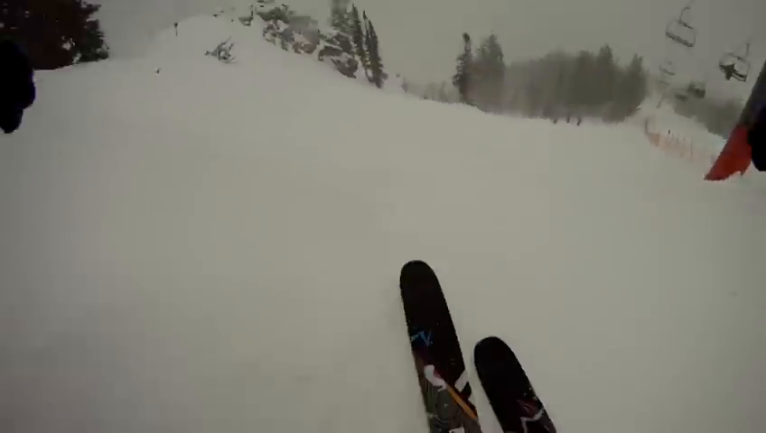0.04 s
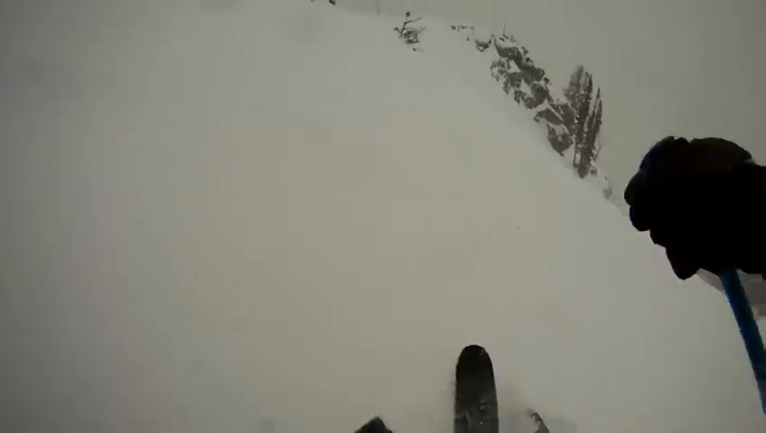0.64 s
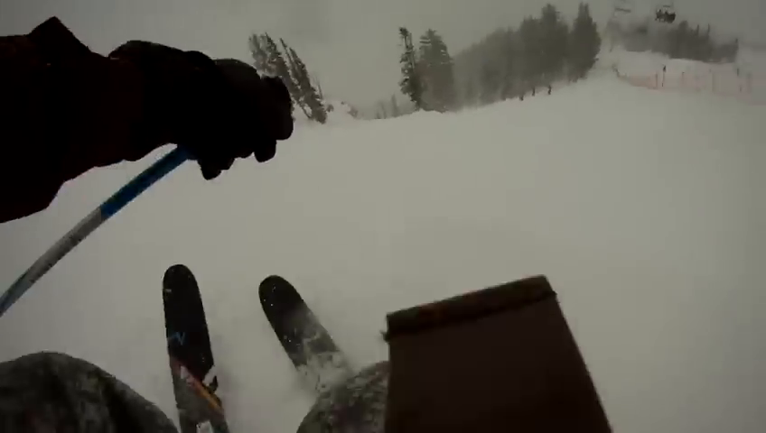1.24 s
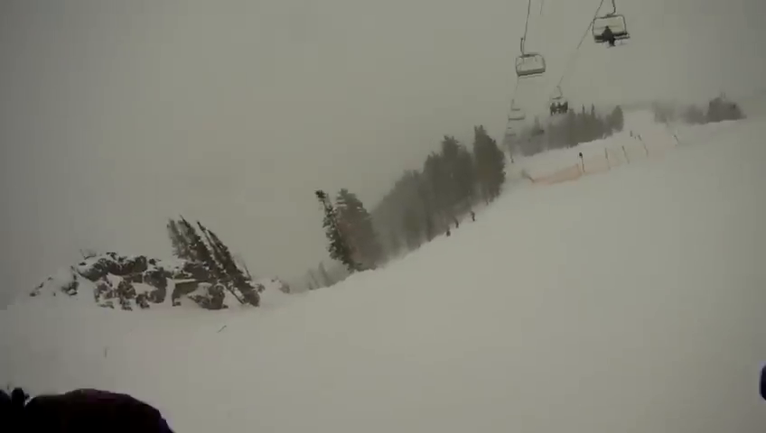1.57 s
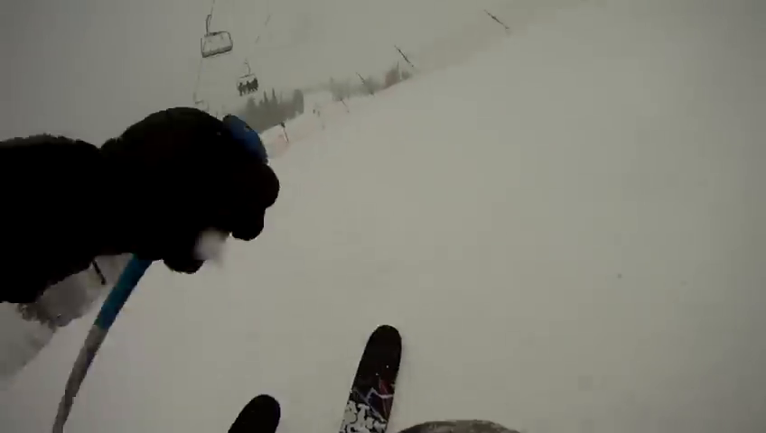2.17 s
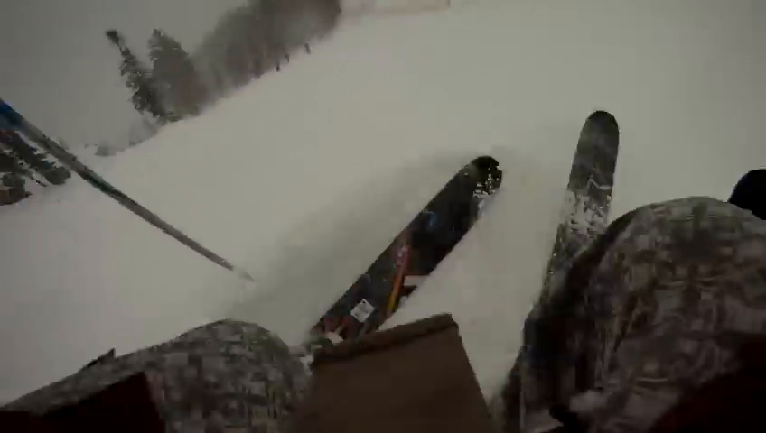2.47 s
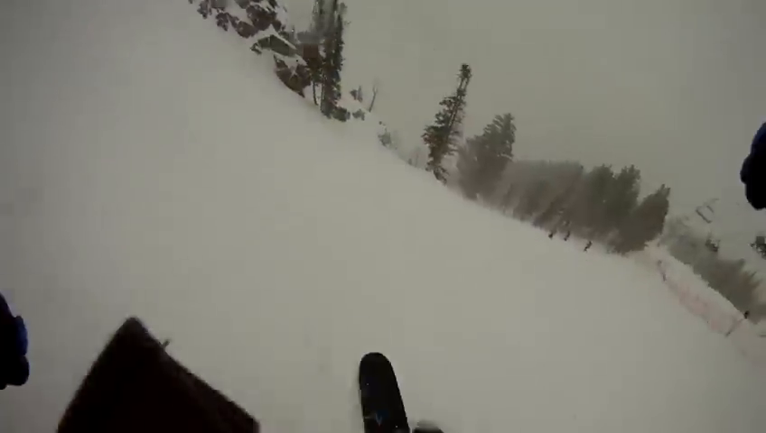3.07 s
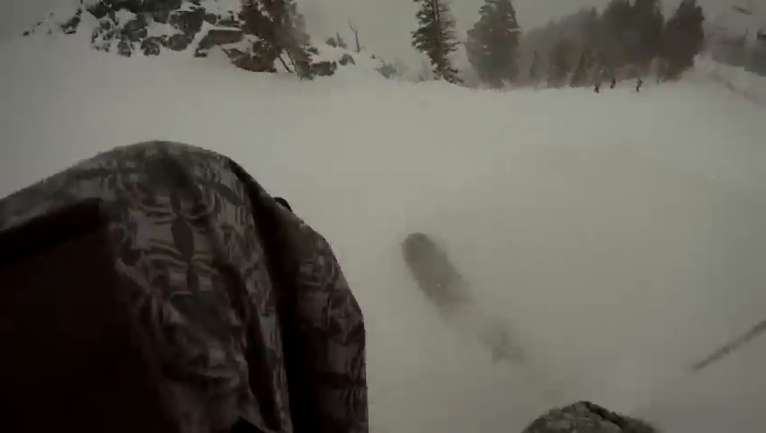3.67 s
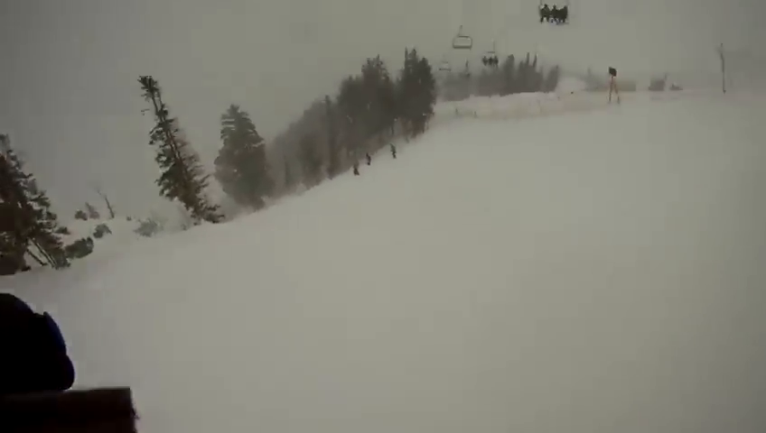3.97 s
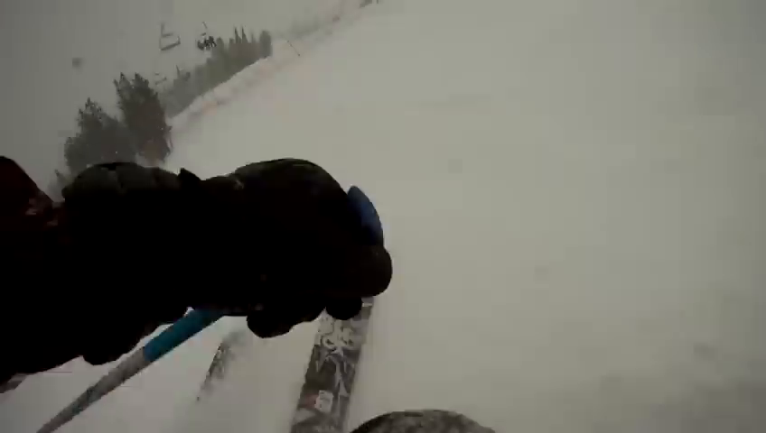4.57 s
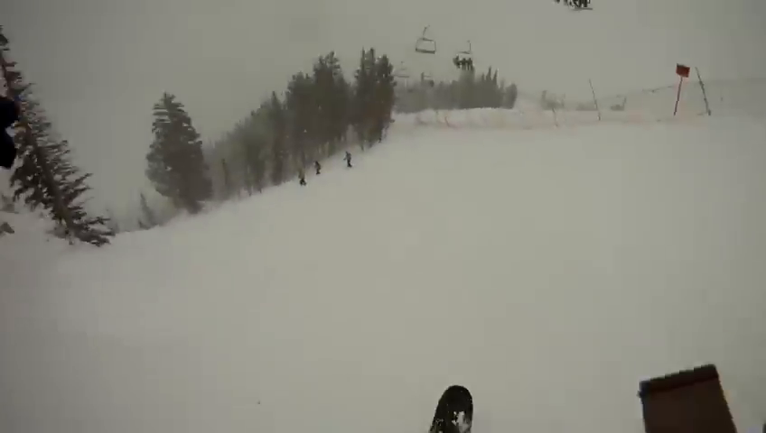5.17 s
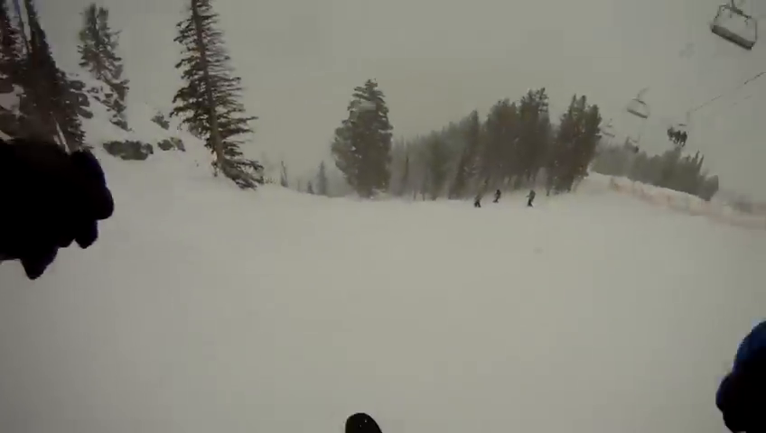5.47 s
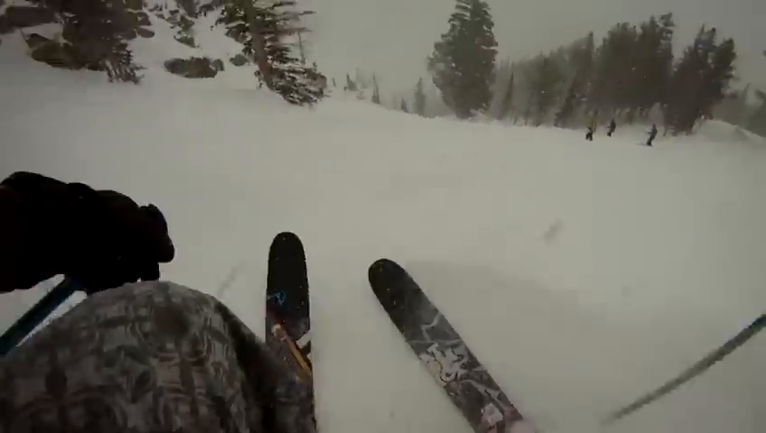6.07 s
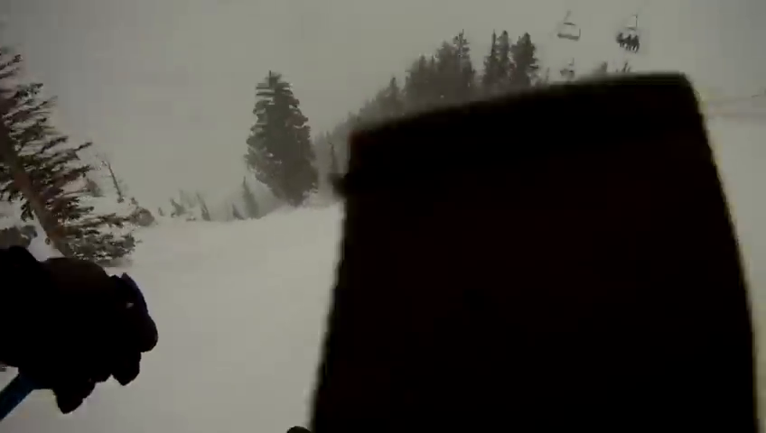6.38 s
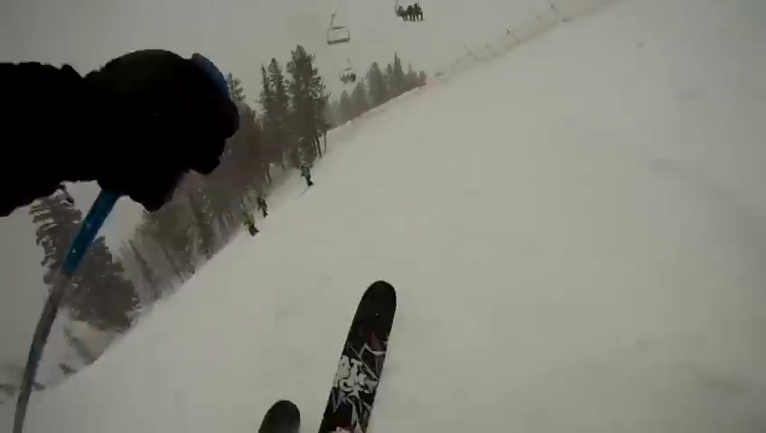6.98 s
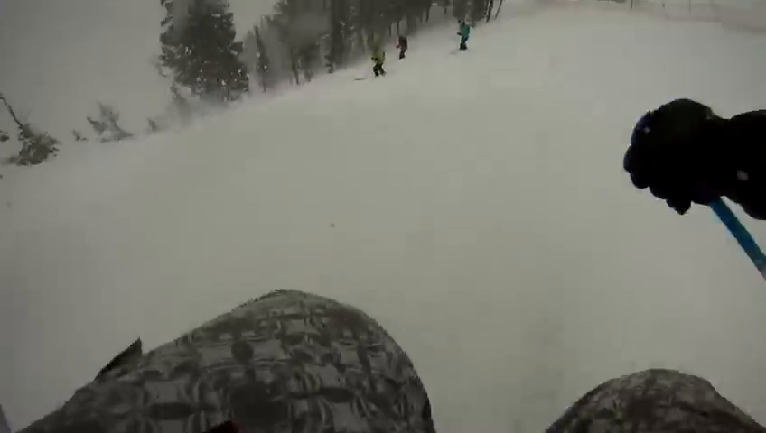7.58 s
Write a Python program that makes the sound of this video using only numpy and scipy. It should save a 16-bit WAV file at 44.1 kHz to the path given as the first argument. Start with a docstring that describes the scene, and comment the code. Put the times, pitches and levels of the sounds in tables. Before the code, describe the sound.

Skis plough through deep powder in linked turns, the hollow hiss of snow swelling and fading over low wind buffeting. A stiff jacket crackles, while snow lumps and a strap buckle tick and knock on the microphone's plastic case. Twice, hard landings bring loud rattling, a sharp scrape and a deep thud; lighter knocks and another scrape follow. The microphone rides on the skier's chest, sounding close and boxy, with no echo.

```python
"""On a slope of deep powder, a skier links turns with a camera in a closed plastic case on the chest.
Wind buffeting and jolts of the body rumble below; the skis plough, spray hisses and the jacket crackles.
Lumps of snow and a loose strap tick, knock and scrape on the case, which rattles in its mount on
hard landings. The case colours these contact forces with its resonances, and the hardest blows
overload the microphone inside."""
import sys
import numpy as np
from scipy import signal
from scipy.fft import rfft, irfft
from scipy.io import wavfile

SR = 44100
rng = np.random.default_rng(int(sys.argv[2]) if len(sys.argv) > 2 else 0)


def master(y):
    """Save y as 16-bit WAV."""
    cut = np.clip(np.atleast_2d(y).T, -1, 1)
    pcm = np.round(cut * 32767)  # scale
    wavfile.write(sys.argv[1], SR, pcm.astype(np.int16))


N = 344845
CAVITY_ROUND_TRIP_S, BAND_LIMIT_HZ = 0.00092, 15330
RUN_SPRAY_DB, RUN_PLOUGH_DB, RUN_WIND_DB = -56.5, -53, -52  # steady levels between turns
SWELL_DB, SWELL_SHAPE = 10, 1.15  # drop at one rise or fall time from the top; shape 1 pointed, 2 round

# How the case passes each kind of contact: (frequency [Hz], relative gain [dB])
PLOUGH_SPECTRUM = [(100, 0), (300, -4.5), (550, -5.5), (900, -4), (1350, 2.5), (1650, -1.5), (2300, -9),
                   (4000, -33), (8000, -17.5), (14500, -17)]
SPRAY_SPECTRUM = [(100, -15), (700, -16), (1150, -18), (1600, 5.5), (2150, -7.5), (2500, 2.5), (3000, -3.5),
                  (3900, -21), (7500, -41), (9700, -11), (11000, -19), (13000, -12), (15000, -18)]
AIRY_SPECTRUM = [(100, -17), (700, -18), (1200, -7.5), (1850, 5.5), (2800, 1.5), (4400, 0.5), (7700, -5),
                 (10500, -11.5), (15000, -7)]
CLOTH_SPECTRUM = [(100, -7), (750, -15), (1100, -6.5), (1400, 4), (1700, -1.5), (3000, -2), (3750, 3.5),
                  (4250, 0.5), (4700, -1.5), (5150, -4), (7200, -6), (8250, -2.5), (9200, -13),
                  (14000, -15.5)]
FOLD_SPECTRUM = [(100, -24), (700, -27), (1400, 6.5), (3000, 1.5), (3700, 6), (5300, -2.5), (8200, -0.5),
                 (9500, -5.5), (15000, -14)]
PACKED_SNOW_SPECTRUM = [(100, -23), (700, -24.5), (1150, -15), (1700, -2), (2150, 3.5), (2600, -6.5),
                        (3000, -0.5), (3900, -16.5), (7500, -28), (9500, -8.5), (11000, -19), (14500, -16)]
BUMP_SPECTRUM = [(30, -16), (150, 0.5), (700, 0), (1400, -4), (2300, -18), (5000, -42), (14500, -12)]
KNOCK_SPECTRUM = [(30, -37), (150, -21), (750, -29), (1130, 4), (1330, 11.5), (1650, 1), (2500, -48),
                  (14500, -17)]
# Bands that the closed case shuts out: (centre [Hz], half width [Hz], depth [dB])
STOP_BANDS = [(6030, 400, 15), (12100, 1050, 25)]
# Modes of the knocked shell and the rattling mount: (frequency [Hz], relative level [dB], t60 [s])
SHELL_MODES = [(1132, -22, 0.041), (1230, -16, 0.016), (1720, -22, 0.035), (3450, -30.5, 0.035)]
RATTLE_MODES = [(1176, -11.5, 0.05), (1433, -0.5, 0.014), (2370, -3, 0.01), (3650, 5, 0.0055),
                (3840, 1.5, 0.0093), (5000, -3.5, 0.0056), (6820, -2.5, 0.0039), (8080, -2.5, 0.011)]
# Modes of each spot that the buckle strikes: (frequency [Hz], relative level [dB], t60 [s])
FACE_MODES = [(630, 1.5, 0.0049), (1180, -4, 0.018), (1400, 0.5, 0.015), (2650, 0, 0.0055),
              (3390, 4.5, 0.0075), (4560, 7, 0.0027), (8556, -1.5, 0.0071)]
CORNER_MODES = [(610, 4, 0.0052), (1236, -0.5, 0.016), (1753, 7, 0.0097), (2495, 12, 0.0052),
                (3360, 10.5, 0.0054), (4868, -5.5, 0.0084), (7070, -4.5, 0.0081)]
MOUNT_MODES = [(1350, -11.5, 0.022), (2000, -1, 0.0056), (3460, -2.5, 0.008), (8624, -8.5, 0.0072)]

# Turns and drifts load the skis and shake the skier:
# (deepest time [s], rise [s], fall [s], ploughing level [dB], buffeting level [dB])
SKI_TURNS = [(.32, 0.076, 0.12, -49.5, -38), (.95, 0.29, 0.19, -50, -47), (1.26, 0.17, 0.096, -44, -43),
             (1.84, 0.061, 0.091, -41.5, -33), (2.22, 0.44, 0.1, -55.5, -40),
             (2.49, 0.12, 0.12, -44.5, -35.5), (2.65, 0.042, 0.053, -37, -29.5),
             (3.11, 0.022, 0.06, -41.5, -37.5), (3.66, 0.083, 0.19, -36.5, -36),
             (4.29, 0.13, 0.15, -35.5, -30.5), (4.405, 0.047, 0.018, -26, -26),
             (4.7, 0.075, 0.28, -49, -42), (5.53, .09, 0.041, -54.5, -45.5), (6.18, 0.33, 0.16, -50, -45),
             (6.5, 0.011, 0.028, -39, -43), (6.73, 0.098, 0.035, -45.5, -40),
             (6.92, 0.17, 0.31, -45.5, -40.5), (7.3, 0.13, 0.13, -45.5, -38),
             (7.57, 0.037, 0.054, -41.5, -30)]
# Bumps in the snow jolt the chest mount: (time [s], envelope peak [dB], frequency [Hz])
MOUNT_JOLTS = [(0.665, -32.5, 147), (0.903, -32.5, 79), (0.991, -33.5, 89), (1.851, -30, 35.6),
               (1.875, -26, 120), (2.655, -15.5, 88), (3.64, -27.5, 270), (3.688, -35, 300),
               (3.858, -27.5, 92), (4.086, -24, 93), (4.397, -21.5, 141), (5.53, -30.5, 33.8),
               (5.944, -34, 104), (6.906, -27.5, 33)]
# Powder thrown against the chest: (thickest time [s], rise [s], fall [s], hiss level [dB])
POWDER_CLOUDS = [(.13, 0.074, 0.091, -43.5), (.3, 0.23, 0.12, -42), (.435, 0.04, 0.024, -45),
                 (.72, 0.16, 0.064, -44.5), (.83, 0.039, 0.14, -50), (1.76, 0.053, 0.13, -40.5),
                 (2.15, 0.14, 0.039, -49.5), (2.6, 0.12, 0.062, -34), (3.1, 0.019, 0.042, -42),
                 (3.3, 0.048, 0.076, -54), (3.61, 0.064, 0.078, -40), (3.785, 0.049, 0.08, -35),
                 (4.34, 0.11, 0.092, -31.5), (4.58, 0.37, 0.27, -48), (4.93, 0.046, 0.077, -47.5),
                 (5.12, 0.11, 0.092, -48), (5.51, 0.12, 0.14, -48.5), (5.74, 0.087, 0.31, -48.5),
                 (6.65, 0.061, 0.11, -40), (6.99, 0.19, 0.32, -43), (7.32, 0.066, 0.13, -42.5),
                 (7.58, 0.079, 0.018, -32)]
# Short airy hisses of blown powder or brushing cloth: (start [s], end [s], level [dB])
AIRY_HISSES = [(0.705, 0.94, -46.5), (2.173, 2.188, -36.5), (2.227, 2.296, -43), (2.987, 3.03, -36.5),
               (3.067, 3.083, -37.5), (3.183, 3.197, -33), (3.311, 3.337, -35.5), (4.665, 4.725, -40.5),
               (5.427, 5.465, -38), (5.687, 5.708, -36.5), (5.971, 6.008, -39)]
# The jacket works as the body bends and stretches: (time [s], crackle level [dB])
JACKET_FLEX = [(0, -48.5), (.9, -50), (1.05, -62), (1.6, -58.5), (2.0, -45), (2.42, -45), (2.85, -49),
               (3.15, -46.5), (3.45, -49.5), (3.9, -48), (4.3, -42), (4.7, -49.5), (5.25, -53.5),
               (5.7, -45), (6.4, -47), (7.3, -42.5), (7.82, -45)]
# Stiff folds of the jacket snap: (time [s], level over 4 ms [dB])
FOLD_SNAPS = [(.0085, -33.5), (.3578, -24), (0.4608, -38), (.6375, -44), (1.2682, -29), (1.321, -35.5),
              (1.7695, -14.5), (1.873, -21.5), (1.962, -18), (2.2229, -32), (2.546, -34), (2.7231, -34),
              (2.9204, -40), (3.1007, -31), (3.2235, -35.5), (3.2269, -34.5), (3.3484, -33.5),
              (3.5477, -37), (4.5365, -31), (4.6968, -35.5), (4.812, -26.5), (4.817, -31), (4.822, -34),
              (4.908, -22.5), (5.153, -33.5), (5.5408, -34), (5.573, -32), (5.722, -35.5), (5.8006, -32.5),
              (6.2138, -33.5), (6.2774, -37), (6.733, -37), (6.763, -25), (6.798, -34.5)]
# Things slide over the case:
# (start [s], loudest time [s], end [s], top level [dB], colour [0 cloth to 1 packed snow])
CASE_SCRAPES = [(1.658, 1.727, 1.756, -37, 0.98), (2.468, 2.472, 2.59, -29.5, 0.035),
                (2.51, 2.534, 2.6, -34, 0.092), (2.637, 2.653, 2.68, -18, 0.94),
                (4.273, 4.278, 4.4, -26.5, 0.054), (4.3, 4.3, 4.4, -33.5, .05),
                (4.383, 4.401, 4.412, -9.5, 0.32), (4.877, 4.894, 5.0, -34.5, 0.39),
                (7.544, 7.576, 7.612, -21.5, 1)]
# A padded arm or strap bumps the case: (time [s], level over 4 ms [dB])
PADDED_BUMPS = [(3.6135, -37), (6.475, -17), (6.501, -21), (6.5092, -26), (6.8929, -34)]
# Blows on the case:
# (time [s], tick level over 4 ms [dB], colour [0 cloth to 1 packed snow], knock level over 4 ms [dB])
CASE_BLOWS = [(0.2701, -34, 0.8, -34), (.592, -53, 0.84, -37), (0.852, -28, 0.91, -33),
              (1.798, -30.5, 0.86, -28), (2.0596, -34.5, 1, -26.5), (2.5283, -22, 0.17, -27),
              (2.5774, -21, 0.81, -45), (2.596, -17, 0.92, -56), (2.6188, -10, 0.96, -39),
              (2.6254, -10, 0.96, -33), (3.6125, -26.5, 0.82, -26), (3.8607, -15.5, 0.93, -30),
              (3.928, -33.5, 0.25, -39), (4.1825, -22, .6, -55), (4.2695, -19.5, 0.49, -24),
              (4.3737, -18.5, 0, -26), (6.0646, -31, 0.94, -39), (6.4747, -27, 0.77, -20),
              (6.493, -37, 0.85, -46), (6.892, -25.5, 0.9, -23), (7.2022, -20, 0.41, -33.5),
              (7.268, -25.5, 0.2, -35), (7.296, -21, 0.35, -33), (7.7126, -60, 0.57, -33)]
# The mount chatters on hard landings: (time [s], level over 4 ms [dB], gain of the low modes [dB])
MOUNT_RATTLES = [(2.4724, -14, 1.5), (2.478, -14.5, 0), (2.482, -9, 3), (2.4861, -15, -5),
                 (2.4972, -11, -11), (2.5012, -7.5, -5.5), (4.277, -14, 2), (4.2808, -8, 3.5),
                 (4.3016, -9, 6.5), (4.3112, -11, 4), (4.3254, -22, -2), (4.3814, -16, 0),
                 (4.3883, -14, -9)]
# The strap buckle strikes: (time [s], gain of the modes [dB], spot [name])
BUCKLE_KNOCKS = [(.3122, -0.5, "face"), (4.084, 2, "corner"), (6.501, -9.5, "mount"),
                 (6.5044, -12.5, "mount"), (6.51, -8, "mount")]


def amp(db):
    """Amplitude grows tenfold for every 20 dB."""
    return 10 ** (np.asarray(db) / 20)


def unit_rms(x):
    """Power normalisation: scales a signal to rms 1."""
    return x / np.sqrt(np.mean(x ** 2) + 1e-20)


def at_level(pulse, db):
    """Equivalent level: gives a pulse the energy of 4 ms of steady sound at db."""
    return np.sqrt(.004 * SR) * amp(db) * pulse / np.linalg.norm(pulse)


def add(mix, time_s, sound):
    """Superposition: a sound adds to the mix from time_s on."""
    part = mix[max(round(time_s * SR), 0):][:len(sound)]
    part += sound[:len(part)]


def wander(rate_hz):
    """Low-pass noise: a smooth random fluctuation of rms 1, mostly slower than rate_hz."""
    hz = np.fft.rfftfreq(N, 1 / SR)
    return unit_rms(irfft(rfft(rng.standard_normal(N)) / (1 + (hz / rate_hz) ** 4), N))


def grains(per_s, spread_db):
    """A Poisson process: randomly timed clicks, most small and a few large."""
    size = amp(spread_db * np.minimum(rng.exponential(1, N), 4))
    return unit_rms(size * rng.choice([-1, 1], N) * (rng.random(N) < per_s / SR))


def impact(rise_s, ragged, size=2048):
    """Crumbling contact: a rough burst of force of energy 1, its spectrum flatter as ragged nears 0."""
    t = np.arange(size) / SR
    spectrum = rfft(rng.standard_normal(size) * t * np.exp(-t / rise_s))
    flattened = spectrum * (abs(spectrum) + 1e-12) ** (ragged - 1)
    force = irfft(flattened) * (t < t[-1] / 2)
    return force / np.linalg.norm(force)


def swells(events, db_column=3):
    """Incoherent addition: the gain of events that build up and die away, summed in power."""
    t, power = np.arange(0, N, 64) / SR, 0
    for event in events:
        top, rise, fall = event[:3]
        distance = np.maximum((top - t) / rise, (t - top) / fall)
        power = power + amp(event[db_column] - SWELL_DB * abs(distance) ** SWELL_SHAPE) ** 2
    return np.interp(np.arange(N) / SR, t, np.sqrt(power))


def case_response(spectrum, echo=0, patchy_db=0, size=2048):
    """Minimum-phase impulse response of the case, of energy 1; an inner echo acts as a comb filter."""
    hz = abs(np.fft.fftfreq(size, 1 / SR))
    point_hz, point_db = np.transpose(spectrum)
    db = np.interp(np.log(hz + 1), np.log(point_hz), point_db)
    db -= sum(depth * np.exp(-((hz - centre) / width) ** 2) for centre, width, depth in STOP_BANDS)
    db += 20 * np.log10(abs(1 + echo * np.exp(2j * np.pi * hz * CAVITY_ROUND_TRIP_S)))
    # every spot on the case has its own patchy colour
    root_hz = np.linspace(0, np.sqrt(SR / 2), 30)
    db += patchy_db * np.interp(np.sqrt(hz), root_hz, rng.standard_normal(len(root_hz)))
    minimum_phase = np.exp(np.conj(signal.hilbert(np.log(amp(db)))))
    response = np.fft.ifft(minimum_phase).real[:size // 2]
    return response / np.linalg.norm(response)


def through_case(force, spectrum, echo=0, patchy_db=0):
    """Linear transmission: the force is convolved with the response of the case."""
    return signal.oaconvolve(force, case_response(spectrum, echo, patchy_db))[:len(force)]


def scatter(force, spectrum, patchy_db, spots=8):
    """Transmission depends on position: each grain takes one of several differently coloured paths."""
    spot = rng.integers(0, spots, N)
    paths = (through_case(force * (spot == k), spectrum, patchy_db=patchy_db) for k in range(spots))
    return unit_rms(sum(paths))


def contact(cloth_force, snow_force, colour):
    """An equal-power blend shares a contact between the colours of cloth and packed snow."""
    cloth = through_case(cloth_force, CLOTH_SPECTRUM)
    snow = through_case(snow_force, PACKED_SNOW_SPECTRUM)
    return np.sqrt(1 - colour) * cloth + np.sqrt(colour) * snow


def shell_ring():
    """Free vibration: the modes of the shell decay exponentially after one push."""
    t = np.arange(2048) / SR
    return sum(amp(db - 60 * t / t60) * np.sin(2 * np.pi * hz * t) for hz, db, t60 in SHELL_MODES)


def airborne_powder():
    """Thin steady spray and passing clouds add in power to give the gain of the snow in the air."""
    return np.hypot(amp(RUN_SPRAY_DB), swells(POWDER_CLOUDS))


def wind(low_hz=11, corner_hz=135, order=1.92):
    """Turbulence buffets the case with lumpy pressure fluctuations, nearly all of them deep."""
    hz = np.fft.rfftfreq(N, 1 / SR)
    high_pass = hz ** 2 / (hz ** 2 + low_hz ** 2)
    low_pass = 1 / np.sqrt(1 + (hz / corner_hz) ** (2 * order))
    shape = high_pass * low_pass / (hz + low_hz) ** 0.57
    buffets = irfft(rfft(rng.standard_normal(N)) * shape, N) * amp(3 * wander(rate_hz=28))
    return np.hypot(amp(RUN_WIND_DB), swells(SKI_TURNS, db_column=4)) * unit_rms(buffets)


def jolts(rise_cycles=0.3):
    """A heavily damped oscillator: the mount heaves once and settles with a soft, deep thud."""
    out, t = np.zeros(N), np.arange(SR // 4) / SR
    for time_s, db, hz in MOUNT_JOLTS:
        age = t * hz / rise_cycles
        add(out, time_s, amp(db) * age * np.exp(1 - age) * np.sin(2 * np.pi * hz * t))
    return out


def mist(db=-49, follow=0.95):
    """Filtered white noise: snow dust streams past in a smooth hiss that swells with the clouds."""
    hiss = through_case(rng.standard_normal(N), AIRY_SPECTRUM)
    return amp(db) * unit_rms(airborne_powder() ** follow * hiss)


def ploughing():
    """Granular compaction: snow packs and gives way under the skis in soft, uneven crunches."""
    crunch = grains(per_s=3000, spread_db=3) * amp(2.6 * wander(rate_hz=35))
    load = np.hypot(amp(RUN_PLOUGH_DB), swells(SKI_TURNS))
    return load * through_case(unit_rms(crunch), PLOUGH_SPECTRUM)


def sliding(light_hz=2250, loaded_hz=1200, drift=0.072, width_hz=300, gain_db=-5):
    """Noise-driven resonance: the hollow hiss of sliding snow sinks under load, rises as powder flies."""
    load = swells(SKI_TURNS)
    flow = np.hypot(airborne_powder(), load)
    centre_hz = light_hz * (loaded_hz / light_hz) ** ((load / flow) ** 2)
    centre_hz *= np.exp(drift * wander(rate_hz=13))
    carrier = np.exp(2j * np.pi * np.cumsum(centre_hz) / SR)
    # shifting down, low-passing and shifting back makes a band that follows the centre
    pole = np.exp(-np.pi * width_hz / SR)
    baseband = signal.lfilter([1], [1, -2 * pole, pole * pole], rng.standard_normal(N) / carrier)
    return amp(gain_db) * flow * unit_rms((carrier * baseband).real)


def spray(flakes_db=-20):
    """Shot noise: fine crystals shower the case in puffs, with a few heavier flakes."""
    puffs = amp(1.8 * wander(rate_hz=86))
    shower = through_case(grains(per_s=14000, spread_db=4) * puffs, SPRAY_SPECTRUM, echo=0.56)
    flakes = scatter(grains(per_s=180, spread_db=2.5), SPRAY_SPECTRUM, patchy_db=6)
    return airborne_powder() * unit_rms(unit_rms(shower) + amp(flakes_db) * flakes)


def airy_hisses(taper=0.4):
    """Broadband noise: blown powder or brushing cloth makes short, level, airy hisses."""
    out = np.zeros(N)
    noise = rng.standard_normal(N) * amp(1.4 * wander(rate_hz=130))
    hiss = through_case(noise, AIRY_SPECTRUM)
    for start, end, db in AIRY_HISSES:
        span = np.arange(round(start * SR), round(end * SR))
        add(out, start, amp(db) * signal.windows.tukey(len(span), taper) * unit_rms(hiss[span]))
    return out


def jacket(scuff_s=.0006, rustle_db=-10):
    """Friction: stiff cloth scuffs in clumps of brief noise bursts over a softer rustle."""
    clumps = amp(8 * np.minimum(wander(rate_hz=30), 1.2))
    catches = abs(grains(per_s=200, spread_db=2.9) * clumps)
    scuffs = signal.lfilter([1], [1, -np.exp(-1 / (scuff_s * SR))], catches)
    crackle = scatter(scuffs * rng.standard_normal(N), FOLD_SPECTRUM, patchy_db=6)
    rubbing = grains(per_s=5000, spread_db=3) * amp(3.2 * wander(rate_hz=45))
    rustle = unit_rms(through_case(rubbing, CLOTH_SPECTRUM))
    flex_db = np.interp(np.arange(N) / SR, *np.transpose(JACKET_FLEX))
    return amp(flex_db) * unit_rms(crackle + amp(rustle_db) * rustle)


def fold_snaps():
    """Snap-through buckling: a stiff fold flips over with one dry tick."""
    out = np.zeros(N)
    for time_s, db in FOLD_SNAPS:
        tick = through_case(impact(rise_s=0.00062, ragged=0.29), CLOTH_SPECTRUM, patchy_db=4.5)
        add(out, time_s, at_level(tick, db))
    return out


def scrapes(edge_db=11, ring_db=-5):
    """Stick-slip friction swells with pressure, then breaks off; stiff cloth also rings the shell."""
    out = np.zeros(N)
    slips = amp(2 * wander(rate_hz=190))
    cloth = slips * grains(per_s=2400, spread_db=1)
    snow = slips * grains(per_s=6100, spread_db=4)
    ringing = unit_rms(signal.oaconvolve(np.diff(cloth, prepend=0), shell_ring())[:N])
    for start, top, end, db, colour in CASE_SCRAPES:
        span = np.arange(round(start * SR), round(end * SR))
        pressure = amp(np.interp(span / SR, [start, top, end], [db - edge_db, db, db - edge_db]))
        rub = unit_rms(contact(cloth[span], snow[span], colour))
        rub += amp(ring_db) * (1 - colour) * ringing[span]
        add(out, start, pressure * signal.windows.tukey(len(span), .12) * unit_rms(rub))
    return out


def padded_bumps():
    """Soft contact carries little treble: one dull push on the case with hardly any ring."""
    out, push = np.zeros(N), case_response(BUMP_SPECTRUM)
    for time_s, db in PADDED_BUMPS:
        add(out, time_s, at_level(push, db))
    return out


def blows(lag_s=0.00067):
    """Impact excitation: the surface ticks, and a moment later the whole case gives way and rings."""
    out, ring = np.zeros(N), shell_ring()
    knock = through_case(signal.unit_impulse(len(ring)), KNOCK_SPECTRUM) + ring
    for time_s, tick_db, colour, knock_db in CASE_BLOWS:
        cloth_force, snow_force = (impact(rise_s=0.00074, ragged=0.32) for _ in range(2))
        add(out, time_s, at_level(contact(cloth_force, snow_force, colour), tick_db))
        add(out, time_s + lag_s, at_level(knock, knock_db))
    return out


def rattles(low_modes_below_hz=2000):
    """Contact chatter: each clack is a tiny burst of force that excites the modes of the mount."""
    out, t = np.zeros(N), np.arange(2048) / SR
    for time_s, clack_db, low_db in MOUNT_RATTLES:
        ring = np.zeros(len(t))
        for hz, db, t60 in RATTLE_MODES:
            mode_db = db + low_db * (hz < low_modes_below_hz)
            ring += amp(mode_db - 60 * t / t60) * np.cos(2 * np.pi * hz * t)
        chatter = signal.fftconvolve(impact(rise_s=0.00066, ragged=0.14), ring)
        clack = through_case(chatter, spectrum=[(8500, 7.5), (10000, 2)])
        add(out, time_s, at_level(clack, clack_db))
    return out


def buckle_knocks():
    """Modal superposition: the buckle rings one spot, whose neighbouring modes start in antiphase."""
    out, t = np.zeros(N), np.arange(2048) / SR
    modes_at = {"face": FACE_MODES, "corner": CORNER_MODES, "mount": MOUNT_MODES}
    for time_s, gain_db, spot in BUCKLE_KNOCKS:
        for k, (hz, db, t60) in enumerate(modes_at[spot]):
            decay = amp(gain_db + db - 60 * t / t60)
            add(out, time_s, (-1) ** k * decay * np.sin(2 * np.pi * hz * t))
    return out


def scene():
    """Free field: open snow gives no echo, and all sources sum at one microphone inside the case."""
    rumble = wind() + jolts()
    snow = mist() + ploughing() + sliding() + spray()
    snow_and_cloth = snow + jacket() + airy_hisses() + fold_snaps()
    on_case = scrapes() + padded_bumps() + blows() + rattles() + buckle_knocks()
    mono = rumble + snow_and_cloth + on_case
    return np.array([mono, mono])


def record(dry):
    """Saturation: the hardest blows overload the microphone; a low-pass filter then limits the band."""
    saturated = np.clip(dry, -1, 1)
    low_pass = signal.firwin(301, BAND_LIMIT_HZ, window=("kaiser", 7), fs=SR)
    return signal.oaconvolve(saturated, low_pass[None], "same")


dry = scene()
out = record(dry)
master(out)
```